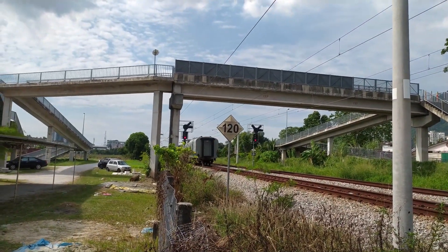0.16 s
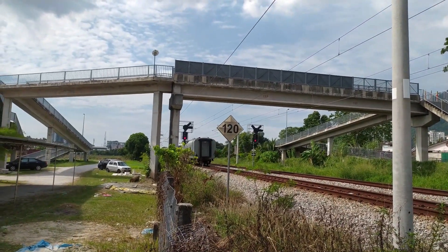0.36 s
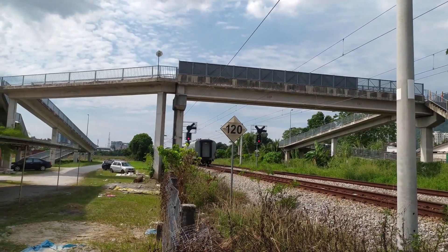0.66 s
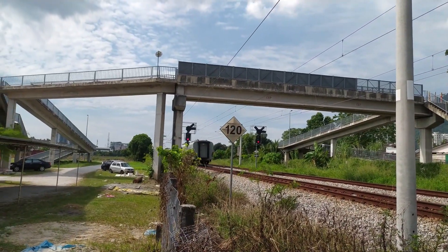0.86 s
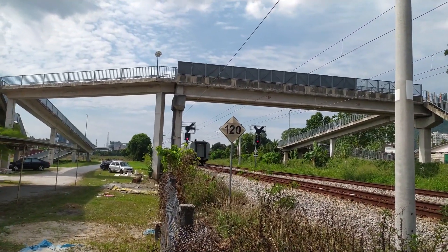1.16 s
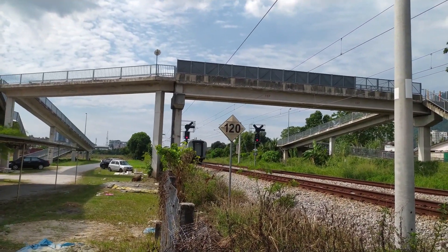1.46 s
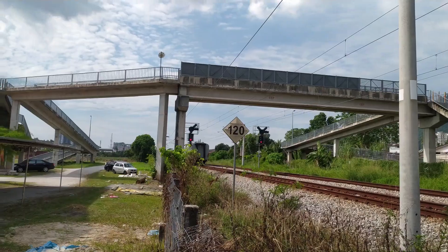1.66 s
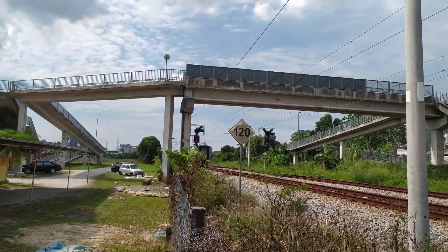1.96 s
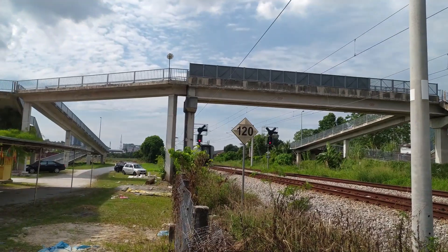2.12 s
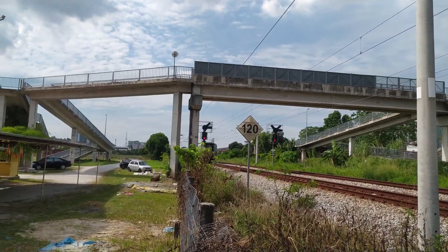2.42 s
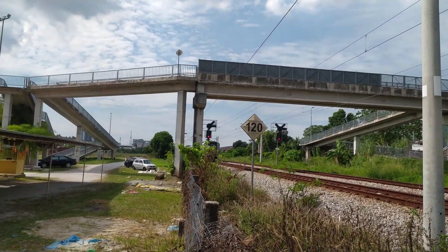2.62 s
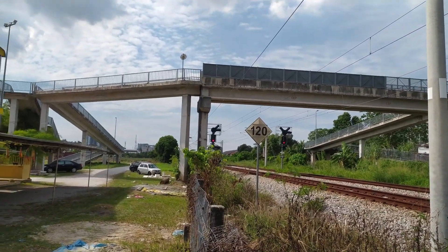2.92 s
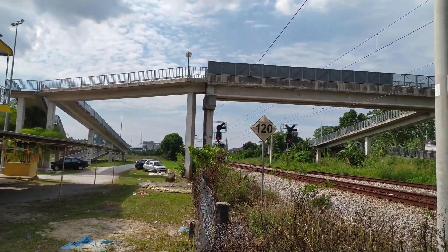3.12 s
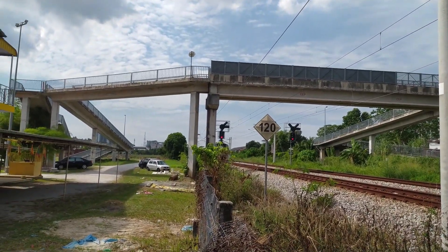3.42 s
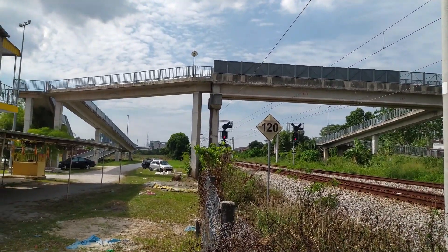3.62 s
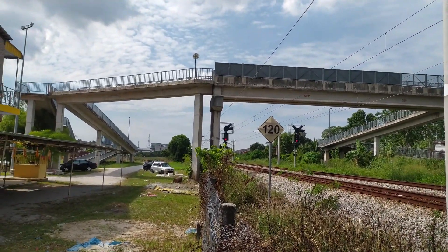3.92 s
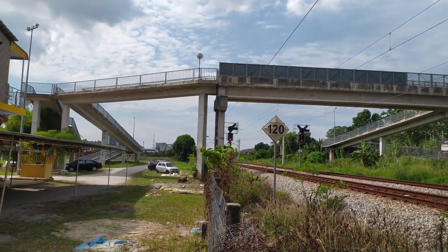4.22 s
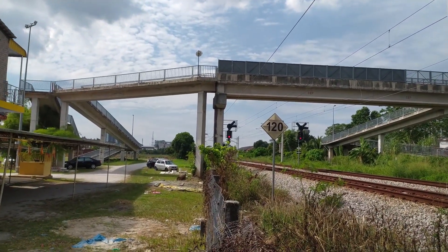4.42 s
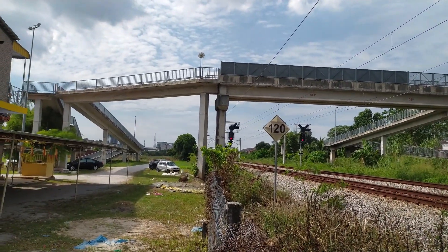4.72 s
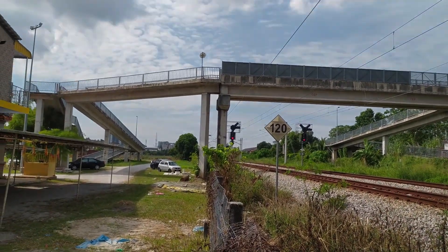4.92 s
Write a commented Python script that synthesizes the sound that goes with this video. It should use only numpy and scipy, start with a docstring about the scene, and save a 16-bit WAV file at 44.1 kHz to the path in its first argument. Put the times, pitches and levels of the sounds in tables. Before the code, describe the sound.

Fading train rumble under airy hiss, interrupted by a power cutter that whirs up hissing, then grinds loudly with metallic ringing and a sagging motor.

```python
"""A train rolls away in filtered noise, rumble and wash fading over hums and a sinking outdoor hiss.
A distant bird peeps once on the left, in two sine pulses. Off to the right a power cutter starts up:
noise shaped into whir and whistles. Motor tones, sines at shaft multiples, come up; then noise through
steel modes makes the blade bite and ring while the motor sags under the load."""
import sys
import numpy as np
from scipy import signal
from scipy.io import wavfile
from scipy.ndimage import uniform_filter1d

SR = 44100
rng = np.random.default_rng(int(sys.argv[2]) if len(sys.argv) > 2 else 0)


def volts_from_decibels(level):
    """Turn decibel levels (scalar or array-like) into linear amplitude factors."""
    exponent = np.asarray(level, float) / 20
    return 10 ** exponent


def put_to_file(sound):
    """Save the sound as 16-bit audio at rate SR, in the file named by the first command-line argument."""
    columns = np.atleast_2d(sound).T  # one column per channel
    safe = np.clip(columns, -1, 1)
    whole_steps = np.round(safe * 32767)
    wavfile.write(sys.argv[1], SR, whole_steps.astype(np.int16))


N = 223652
FRAME, HOP = 2048, 512
HZ = np.fft.rfftfreq(FRAME, 1 / SR)[:, None]
TIMES = np.arange(N // HOP + 5) * HOP / SR
CUTTER_LAG_S, TRAIN_LAG_S = 21 / 44100, 8 / 44100  # the left channel lags the right

# whir spectrum: freq_hz, relative_db
WHIR_COLOUR = [(700, -10), (1500, -2.5), (2300, -1.5), (2800, -1), (3250, -6), (4100, -13), (5000, -4.5),
               (6300, 0), (7600, -3), (8250, 6.5), (9600, -1.5), (10200, 4.5), (11000, -6), (12400, -13.5),
               (13300, -1.5), (14300, -17), (15500, -13)]
# cutter stereo: freq_hz, left_right_likeness
CUTTER_LIKENESS = [(500, 0.99), (1500, 1), (2500, 0.95), (4500, 0.39), (6500, 0.72), (11000, 0.56)]
# whistles: full_speed_hz, width_hz, resting_db
WHISTLES = [(2287, 260, -49), (6810, 410, -41.5), (9125, 120, -33.5)]
# level bumps on the whistles: centre_s, whistle_index, length_s, db_above_rest
FLARES = [(1.8, 0, 0.28, 11.5), (2.0, 0, 0.21, 6.5), (2.16, 0, 0.027, 10), (2.25, 0, 0.056, 9),
          (1.735, 1, 0.024, -2), (1.83, 1, 0.063, 10.5), (2.03, 1, 0.09, 7), (2.02, 2, 0.044, 7),
          (2.16, 2, 0.015, 11), (2.23, 2, 0.087, 13), (3.62, 2, 0.038, 12)]
HISS_DB, HISS_MISSING_DB, HISS_RISE_S = -27.5, -15, 0.39  # full speed, shortfall at start, time constant
BURIED_FROM_S, BURIED_TO_S, BURIED_HISS_DB = 3.6, 3.64, -11  # the work muffles the hiss
HUMP_DB, HUMP_UNDER_BITE_DB = -41.5, -31.5  # free; relative to the biting blade
HIGH_CLIMB_HZ, HIGH_MISSING_DB = 308, -11.5  # high whistle's shortfalls at switch-on
LOW_UNDER_BITE_DB = -21.5  # low whistle, relative to the biting blade


def whir():
    """Air torn by the spinning disc: broad hiss, a hump near 4 kHz and three fuzzy whistles."""
    spin_missing = missing(TIMES, SPIN_UP_S)
    buried = np.interp(TIMES, (BURIED_FROM_S, BURIED_TO_S), [0, 1])
    bite = volts_from_decibels(level_at(BITE, TIMES)) * buried

    hiss_db = HISS_DB + HISS_MISSING_DB * missing(TIMES, HISS_RISE_S) + BURIED_HISS_DB * buried
    power = (volts_from_decibels(hiss_db) * unit(volts_from_decibels(read(WHIR_COLOUR)))) ** 2

    hump_gain = volts_from_decibels(HUMP_DB) + volts_from_decibels(HUMP_UNDER_BITE_DB) * bite
    power += (hump_gain * unit(peak(3940, 1130))) ** 2

    for k, (hz, width_hz, resting_db) in enumerate(WHISTLES):
        level_db = resting_db + bumps(own(FLARES, k), TIMES)
        if k == 2:
            level_db = level_db + HIGH_MISSING_DB * spin_missing
            hz = hz - HIGH_CLIMB_HZ * spin_missing
        gain = volts_from_decibels(level_db)
        if k == 0:
            gain = gain + volts_from_decibels(LOW_UNDER_BITE_DB) * bite
        power += (gain * unit(peak(hz, width_hz))) ** 2

    sound = field(np.sqrt(power) * patches(1.44, count=16), CUTTER_LIKENESS, CUTTER_LAG_S)
    return sound * started(SWITCH_ON_S, 0.0024)


# blade in the work, before its onset ramp: time_s, level_db
BITE = [(3.3, -15), (3.526, -29.5), (3.65, -21), (3.772, -19.5), (3.936, -14), (3.964, -18), (3.99, -14.5),
        (5.07, -14)]
# blade mode frequencies: freq_hz
BLADE_HZ = [1245, 1560, 1815, 2230, 2560, 2875, 3555, 3875, 4170, 5010, 5390, 5600, 6050, 6600, 6910, 7500,
            7750, 8030, 8300, 9075, 9350, 9910, 10250, 10620, 11060, 12000, 12620, 13280, 14250, 15050,
            15510]
# blade modes in the same order: width_hz, relative_peak_db
BLADE_MODES = [(50, -9.5), (263, -14), (75.5, -6.5), (172, -8.5), (153, -10.5), (40.8, -4.5), (40.4, -12.5),
               (45, -9), (55, -11.5), (50, -12.5), (60, -14), (33, -21), (120, -11), (353, -4.5), (150, -1),
               (100, -4.5), (150, -11), (101, 3.5), (252, -5.5), (130, -0.5), (250, -6), (90, -5.5),
               (200, -18), (187, -2), (158, -4.5), (250, -46), (90, -6), (300, -7.5), (250, -14),
               (170, -13.5), (70, -18)]
SCRAPE_DB = -36  # grinding noise relative to the modes, on top of the whir spectrum


def blade():
    """Grinding noise drives the modes of the steel disc; each mode flares and fades by itself."""
    flare = uniform_filter1d(rng.standard_normal((len(BLADE_MODES), len(TIMES))), 4, 1)
    flare_db = 1.6 * flare / flare.std()
    power = volts_from_decibels(SCRAPE_DB + read(WHIR_COLOUR)) ** 2
    for hz, (width_hz, peak_db), wander_db in zip(BLADE_HZ, BLADE_MODES, flare_db):
        power = power + (volts_from_decibels(peak_db + wander_db) * peak(hz, width_hz)) ** 2
    shape = unit(np.sqrt(power) * patches(1.7, count=5))
    sound = field(volts_from_decibels(level_at(BITE, TIMES)) * shape, CUTTER_LIKENESS, CUTTER_LAG_S)
    return sound * started(3.26, 0.35)


SWITCH_ON_S, SPIN_UP_S = 1.73, 0.46  # start, time constant
FULL_TURNS_PER_S, MISSING_TURNS_PER_S = 80.4, 37.6  # full speed, shortfall at switch-on
SAG_FROM_S, SAG_TURNS_PER_S2 = 3.55, 6.9


def missing(t, tau_s):
    """Share still missing after switch-on, decaying exponentially from 1 towards 0."""
    return np.exp(-np.maximum(t - SWITCH_ON_S, 0) / tau_s)


def speed(t, lag_s=0):
    """Shaft turns a second: spins up, then sags under load."""
    spin_up = FULL_TURNS_PER_S - MISSING_TURNS_PER_S * missing(t, SPIN_UP_S)
    return spin_up - SAG_TURNS_PER_S2 * np.maximum(t - SAG_FROM_S - lag_s, 0)


# shaft orders running free, before ramps, load and wander: multiple, level_db
FREE_ORDERS = [(5, -56), (14, -60), (20, -62)]
# housing resonances lifting orders that slide through: freq_hz, width_hz, peak_db before ramps and wander
HOUSING = [(565, 50, -48), (625, 70, -43), (745, 70, -40), (920, 100, -47), (1010, 80, -49),
           (1250, 100, -45), (1390, 100, -47), (1800, 70, -37), (2250, 150, -42)]
# fan whine, before the onset ramp: time_s, level_db
WHINE = [(2.3, -60), (3.05, -47), (4.55, -47.5), (5.07, -66)]
RISE_FROM_S, RISE_TO_S, RISE_FROM_DB = 2.3, 3.05, -10  # shaft orders grow to 0 dB
LOAD_FROM_S, LOAD_TO_S = 3.6, 3.75
ODD_DB = -9  # odd orders under load
FAN_ORDER, FAN_LAG_S = 7, 0.22  # the fan whine sags later than the shaft


def motor():
    """Shaft orders as sines; load slows the shaft and drives mainly the even orders through the housing."""
    t = np.arange(N) / SR
    frame_t = t[::HOP]
    shaft = speed(t)
    turns = np.cumsum(shaft) / SR
    rise_db = np.interp(t, (RISE_FROM_S, RISE_TO_S), [RISE_FROM_DB, 0])
    load = np.interp(t, (LOAD_FROM_S, LOAD_TO_S), [0, 1])
    free_db = dict(FREE_ORDERS)

    orders = np.zeros(N)
    for k in range(5, 33):
        order_hz = k * shaft[::HOP]
        lift = sum(volts_from_decibels(peak_db) / (1 + (2 * (order_hz - hz) / width_hz) ** 2)
                   for hz, width_hz, peak_db in HOUSING)
        wander = uniform_filter1d(rng.standard_normal(len(lift)), 12)
        wander_gain = volts_from_decibels(2 * wander / wander.std())
        size = np.interp(t, frame_t, lift) * load * volts_from_decibels(ODD_DB * (k % 2))
        size += volts_from_decibels(free_db.get(k, -90)) * (1 - 0.29 * load)
        size *= np.interp(t, frame_t, wander_gain)
        orders += np.sqrt(2) * size * np.sin(2 * np.pi * (k * turns + rng.random()))

    whine_turns = np.cumsum(FAN_ORDER * speed(t, FAN_LAG_S)) / SR
    whine = np.sqrt(2) * volts_from_decibels(level_at(WHINE, t)) * np.sin(2 * np.pi * whine_turns)
    out = (orders * volts_from_decibels(rise_db) + whine) * started(2.7, 0.47)
    return np.array([np.roll(out, round(CUTTER_LAG_S * SR)), out])


# rumble spectrum: freq_hz, relative_db
RUMBLE = [(12, -42), (20, -20), (43, -33), (70, -0.5), (118, -2), (155, 2.5), (248, -5.5), (273, -8.5),
          (420, -13.5), (500, -33), (650, -77), (1100, -120)]
# rolling wash spectrum: freq_hz, relative_db
WASH = [(250, -25), (420, -3.5), (650, 3.5), (1000, -4), (2000, -3), (2800, -13.5), (3500, -33.5),
        (6000, -28)]
# outdoor hiss spectrum: freq_hz, relative_db
AIR = [(1500, 4), (3500, 3.5), (5500, 1), (8500, 3.5), (10300, 3), (11500, -3.5), (13500, -57),
       (15300, -44)]
# brief puffs of the treble hiss: centre_s, length_s, db_above_hiss
PUFFS = [(1.428, 0.017, 5), (1.615, 0.07, 5)]
# train and air stereo: freq_hz, left_right_likeness
TRAIN_LIKENESS = [(30, .9), (60, 0.98), (250, 1), (500, 0.52), (1000, 0.14), (2200, 0.11), (6000, 0.13)]
RUMBLE_DB, RUMBLE_FADE_DB_PER_S = -30.5, -0.99
WASH_NEAR_DB, WASH_FAR_DB, WASH_FADE_S = -31, -36.5, 0.93  # near to far, time constant
AIR_DB, AIR_FADE_DB_PER_S = -37, -3.5


def train_and_air():
    """Noise shaped into rumble and rolling wash that fade with distance, plus the hiss of the open air."""
    rumble_db = RUMBLE_DB + RUMBLE_FADE_DB_PER_S * TIMES
    wash_db = WASH_FAR_DB + (WASH_NEAR_DB - WASH_FAR_DB) * np.exp(-TIMES / WASH_FADE_S)
    air_db = AIR_DB + AIR_FADE_DB_PER_S * TIMES + bumps(PUFFS, TIMES)
    power = (volts_from_decibels(rumble_db) * unit(volts_from_decibels(read(RUMBLE)) * (HZ < 600))) ** 2
    power += (volts_from_decibels(wash_db) * unit(volts_from_decibels(read(WASH)))) ** 2
    power += (volts_from_decibels(air_db) * unit(volts_from_decibels(read(AIR)))) ** 2
    return field(np.sqrt(power) * patches(0.99, count=12), TRAIN_LIKENESS, TRAIN_LAG_S)


# hums fading with the rumble: freq_hz, width_hz, start_gain_db
HUMS = [(26.2, 2.9, -42), (148.5, 14, -39), (475, 6.4, -48), (1437, 11, -47.5)]
# hums with their own fade, the lower two with swells: freq_hz, width_hz, resting_gain_db, fade_db_per_s, steady_share
OWN_FADE_HUMS = [(74, 4, -46, -1, 1.1), (244, 4, -40, -1.5, 1.1), (587, 16, -41, -4, 1.1)]
# swells: centre_s, hum_index, length_s, db_above_rest
SWELLS = [(.8, 0, 0.98, 9.5), (1.45, 0, 0.24, 9), (1.87, 0, 0.28, 7), (3.0, 0, 0.14, 9),
          (3.55, 0, 0.43, 12), (4.3, 0, 0.31, 8), (.36, 1, 0.16, 8.5), (1.42, 1, 0.28, 13),
          (2.73, 1, 0.23, 0), (3.42, 1, 0.4, 6.5), (4.1, 1, 0.33, 5.5)]


def hums():
    """Narrow tones: some fade with the rumble, three fade at their own rates, the lower two with swells."""
    t = np.arange(N) / SR
    out = sum(volts_from_decibels(db) * tone(hz, width_hz) for hz, width_hz, db in HUMS)
    out = out * volts_from_decibels(RUMBLE_FADE_DB_PER_S * t)
    for k, (hz, width_hz, db, fade_db_per_s, steady) in enumerate(OWN_FADE_HUMS):
        level_db = db + fade_db_per_s * t + bumps(own(SWELLS, k), t)
        out += volts_from_decibels(level_db) * tone(hz, width_hz, steady=steady)
    return np.array([np.roll(out, round(TRAIN_LAG_S * SR)), out])


# pulses of the call, before the stereo balance: centre_s, length_s, level_db
PEEPS = [(1.335, .1, -48.5), (1.45, .11, -52)]
PEEP_S, PEEP_HZ, PEEP_DROP_HZ, PEEP_DROP_S = 1.27, 3865, 215, 0.035  # drop start, resting note, drop, time constant


def bird():
    """One thin falling peep in pulses off to the left; phase noise blurs it, as distance does."""
    t = np.arange(N) / SR
    hz = PEEP_HZ + PEEP_DROP_HZ * np.exp(-np.maximum(t - PEEP_S, 0) / PEEP_DROP_S)
    size = bumps([(s, length_s, volts_from_decibels(db)) for s, length_s, db in PEEPS], t)
    blur = uniform_filter1d(rng.standard_normal((2, N)), 400, 1)
    turns = np.cumsum(hz) / SR + np.array([[0], [0.3]]) + 0.15 * blur / blur.std()
    sides = volts_from_decibels(np.array([[2], [-2]]))
    return np.sqrt(2) * sides * size * np.sin(2 * np.pi * turns)


# stereo balance: freq_hz, left_minus_right_db
TILT = [(60, 0.5), (200, .5), (500, 1), (1600, 3), (2700, -1), (4000, 1), (4900, -3), (6000, 0), (7500, -5),
        (8400, 0), (9200, -8), (10000, 0), (10600, 0.5), (12000, 0.5)]
# channel offset above the merged band: freq_hz, offset_cycles
TREBLE_STEP = [(10300, 0.21), (11000, 0.13), (12100, 0.16), (12600, 0.62), (12950, 0), (14600, 0.24),
               (15000, 0.09), (15400, 0)]
MERGED_FROM_HZ, MERGED_TO_HZ, MERGED_LIKENESS = 6820, 10200, 0.9  # both channels nearly alike


def field(magnitude, likeness, lag_s):
    """Two-channel noise of the given short-time magnitude, likeness and arrival lag."""
    a, b, c, d = rng.standard_normal((len(TIMES), len(HZ), 4)).T
    merged = (HZ > MERGED_FROM_HZ) & (HZ < MERGED_TO_HZ)
    same = np.clip(np.where(merged, MERGED_LIKENESS, read(likeness)), 0, 1)
    cycles = np.where(HZ < MERGED_FROM_HZ, HZ * lag_s, read(TREBLE_STEP) * ~merged)
    right = a + 1j * b
    left = same * right + np.sqrt(1 - same ** 2) * (c + 1j * d)
    left = left * np.exp(-2j * np.pi * cycles)
    tilt = volts_from_decibels(read(TILT) / 2)
    z = np.array([left * tilt, right / tilt]) * magnitude
    return signal.istft(z, nperseg=FRAME, noverlap=FRAME - HOP)[1][:, :N]


def patches(depth_db, count):
    """Gain that drifts in blotches, count bins wide and a few frames long."""
    z = rng.standard_normal((len(TIMES), len(HZ))).T
    z = uniform_filter1d(uniform_filter1d(z, count, 0), 3, 1)
    return volts_from_decibels(depth_db * z / z.std())


def tone(hz, width_hz, steady=0.47):
    """A steady sine with narrow noise around it."""
    r = np.exp(-np.pi * width_hz / SR)
    noise = rng.standard_normal(N) + 1j * rng.standard_normal(N)
    z = signal.lfilter([1], [1, -2 * r, r * r], noise)
    carrier = np.exp(2j * np.pi * hz * np.arange(N) / SR)
    return ((steady + 0.76 * z / z.std()) * carrier).real


def read(points, hz=HZ):
    """A table's value at hz, straight on a log frequency axis."""
    f, value = np.transpose(points)
    return np.interp(np.log(hz + 1), np.log(f + 1), value)


def level_at(rows, t):
    """Level of a (time_s, level_db) table at times t."""
    time_s, level_db = np.transpose(rows)
    return np.interp(t, time_s, level_db)


def unit(shape):
    """Scales a magnitude so that each frame has power 1."""
    return shape / np.sqrt((shape ** 2).sum(0) + 1e-20)


def peak(hz, width_hz):
    """Magnitude of a resonance passed twice: 1 at its centre, half at the edges of its width."""
    return 1 / (1 + (2 * (HZ - hz) / np.maximum(width_hz, 1)) ** 2)


def started(start_s, rise_s):
    """Gate that opens linearly from start_s."""
    return np.clip((np.arange(N) / SR - start_s) / rise_s, 0, 1)


def bumps(rows, t):
    """Sum of bell curves (centre_s, length_s, height)."""
    return sum(height * np.exp(-(2 * (t - s) / length_s) ** 2) for s, length_s, height in rows)


def own(rows, which):
    """The rows (centre_s, length_s, db) that belong to one voice."""
    return [(s, length_s, db) for s, k, length_s, db in rows if round(k) == which]


def scene():
    """All sources summed."""
    return whir() + blade() + motor() + train_and_air() + hums() + bird()


def roll_off(x):
    """The treble ends steeply here."""
    return signal.sosfilt(signal.butter(12, 15790, fs=SR, output="sos"), x)


def record(dry):
    """Takes the finished mix to the output."""
    return roll_off(dry)


dry = scene()
out = record(dry)
put_to_file(out)
```